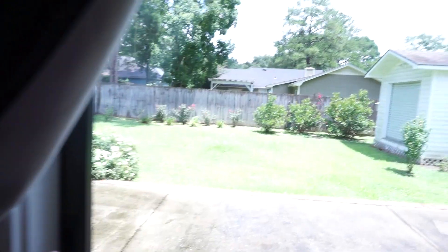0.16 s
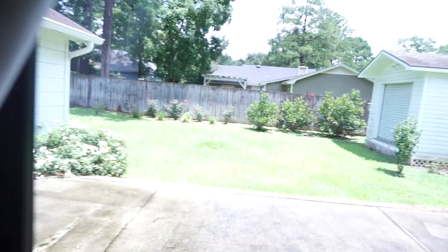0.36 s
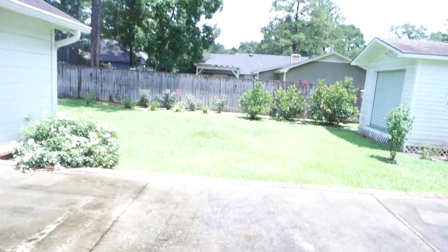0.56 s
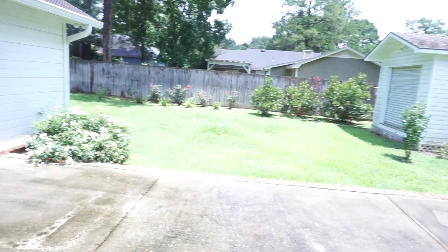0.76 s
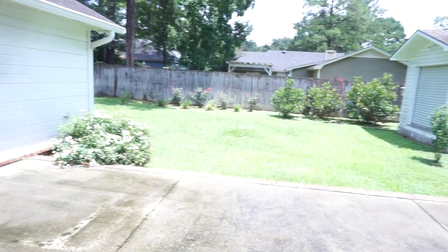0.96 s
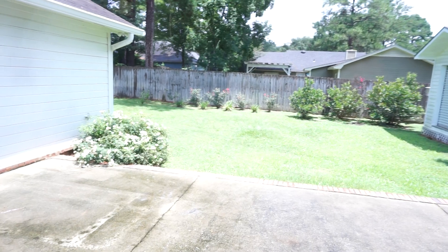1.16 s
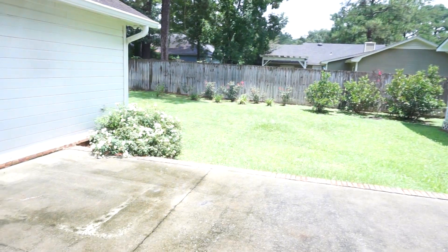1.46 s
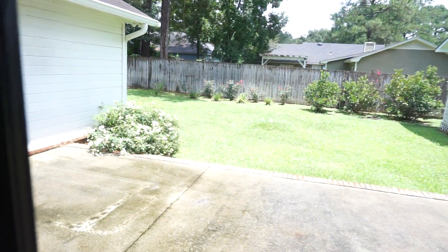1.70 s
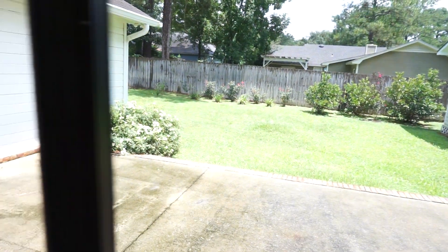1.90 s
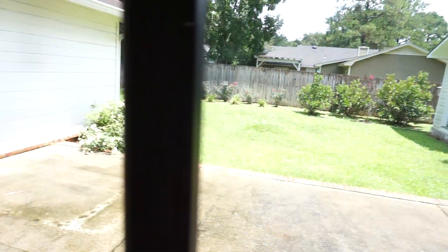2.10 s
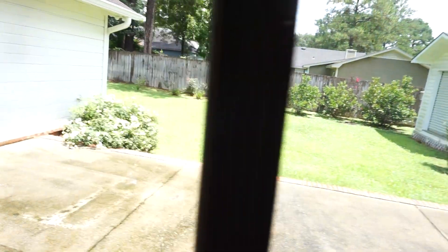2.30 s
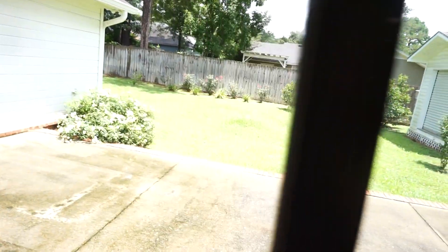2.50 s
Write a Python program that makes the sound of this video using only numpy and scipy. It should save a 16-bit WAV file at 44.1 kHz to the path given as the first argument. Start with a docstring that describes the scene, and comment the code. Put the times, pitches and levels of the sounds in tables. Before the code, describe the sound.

A sliding glass door opens close to a hand-held stereo microphone in a quiet room. Faint air and soft finger thuds come first, thickening from 0.75 to 1 second, with a light curtain brush. At about 1.03 the seal gives with a crackly rush until 1.3. Wheels then roll, loudest around 1.8 to 2.35, rasping, hissing, knocking and rattling with brief squeaks, then easing.

```python
"""Sliding glass door at close range

In a quiet house fingers shift on a hand-held camera: damped sine thuds over low noise in its body.
A curtain brushes past, then the door breaks from its seal with a rush, both as crackly friction noise.
The door rolls open: wheel noise rings resonances of pane and frame, grit rasps, hisses and bursts,
bumps in the track knock as decaying mode pairs, loose parts tick and the rollers squeak in gliding tones."""
import sys
import numpy as np
from scipy import signal
from scipy.fft import rfft, irfft, next_fast_len
from scipy.io import wavfile
from scipy.ndimage import uniform_filter1d, map_coordinates

SR = 44100
rng = np.random.default_rng(int(sys.argv[2]) if len(sys.argv) > 2 else 0)


def dump(signal):
    """Clip the signal to [-1, 1] and save it as 16-bit WAV at the path in sys.argv[1]."""
    limited = np.clip(np.atleast_2d(signal).T, -1, 1)
    pcm = np.round(limited * 32767).astype(np.int16)
    wavfile.write(sys.argv[1], SR, pcm)


N = 116865
T = np.arange(N) / SR  # time [s]

# Noise of the quiet room: (frequency [Hz], relative density [dB])
AIR_SPECTRUM = [(24, -70), (171, -17), (305, 0.5), (715, -9.5), (1180, -9.5), (1680, -13), (16000, -29)]
# Grip noise in the camera body: (time [s], level [dB])
GRIP_LEVEL = [(0, -49.5), (.1, -52.5), (.13, -97), (.3, -53.5), (.44, -54.5), (.55, -45.5), (.72, -50),
              (.8, -36.5), (.9, -33), (.95, -38), (1.0, -30), (1.04, -42), (1.28, -48), (1.55, -35.5),
              (1.75, -45), (2.65, -46)]
# Noise of the camera body: (frequency [Hz], relative density [dB])
BODY_SPECTRUM = [(35, -57), (60, -23), (130, -8), (280, -5.5), (493, -14.5), (1000, -29), (1300, -54),
                 (2200, -120)]
# Finger thuds: (time [s], level [dB], pitch [Hz])
FINGER_THUDS = [(0.004, -34.5, 320), (0.313, -34.5, 324), (0.35, -35, 336), (0.375, -39, 236),
                (0.461, -32.5, 392), (0.473, -33, 357), (0.514, -35.5, 247), (0.551, -29.5, 310),
                (0.67, -35, 298), (0.744, -28.5, 297), (.798, -29, 400), (0.814, -26, 228),
                (0.831, -31, 300), (0.846, -22.5, 493), (0.859, -24.5, 477), (0.869, -30, 285),
                (.883, -25, 456), (0.895, -24.5, 287), (0.915, -22, 360), (0.927, -22, 470),
                (0.947, -31, 354), (0.962, -24, 306), (0.975, -18.5, 446), (.996, -24, 400),
                (1.01, -34, 250)]
# Curtain and seal brushing: (time [s], level [dB], treble level [dB])
BRUSH_LEVELS = [(0.47, -77, -75), (0.495, -64, -75), (0.515, -52, -76), (0.6, -68.5, -82),
                (0.74, -101, -89), (0.765, -52, -53), (0.8, -44, -52), (0.87, -52.5, -69), (0.93, -56, -58),
                (0.97, -49, -47), (0.985, -33, -35.5), (1.025, -25.5, -34), (1.04, -26.5, -38),
                (1.06, -33, -45), (1.11, -28, -40.5), (1.15, -27, -30), (1.25, -29, -33.5),
                (1.272, -31, -38), (1.3, -58, -50.5), (1.36, -48.5, -55)]
# Brushing noise and its treble: (frequency [Hz], relative density [dB])
BRUSH_SPECTRUM = [(300, -18.5), (900, -9), (1600, -9.5), (2500, -5.5), (4200, -11), (5800, -10.5),
                  (7500, -22.5), (12000, -28.5)]
BRUSH_TREBLE_SPECTRUM = [(4000, -9), (8000, -1.5), (12000, -4.5), (16000, -12)]
# Roller squeaks: (start [s], length [s], start pitch [Hz], end pitch [Hz], level [dB], pitch waver [share])
ROLLER_SQUEAKS = [(1.388, .04, 4100, 4150, -44, .03), (1.389, .024, 12300, 12400, -43, .012),
                  (1.668, .065, 3880, 4030, -37.5, .015), (1.752, .03, 3900, 3850, -34, .015),
                  (1.797, .072, 3880, 4000, -33.5, .018), (1.795, .052, 4850, 4950, -31, .02),
                  (2.428, .06, 5500, 8600, -41, .015), (2.515, .025, 4900, 5500, -40, .03),
                  (2.574, .014, 3700, 3950, -36, .03), (1.03, .12, 420, 390, -32, .045),
                  (1.585, .035, 900, 720, -35, .03), (1.226, .042, 2000, 1350, -21, .24)]
# Grit crushed under a wheel: (time [s], level [dB], decay by 60 dB [s], darkness [dB per octave])
GRIT_BURSTS = [(0.5025, -55, 0.11, 11), (1.035, -6, 0.017, 3), (1.3905, -34, 0.16, -3.5),
               (1.498, -40, 0.061, -11), (1.6745, -28, 0.059, 3.5), (1.7325, -32.5, 0.085, 12),
               (1.7666, -22, 0.07, 3), (1.8269, -23.5, 0.078, 8), (1.8997, -14, 0.069, 2.5),
               (2.1201, -22, 0.061, 3), (2.3007, -19, 0.049, 3.5), (2.4568, -24.5, 0.088, 5.5),
               (2.5273, -25, 0.093, 4), (2.5837, -32.5, 0.11, 8.5)]
# Bumps in the track, and two chatters of loose parts near 1.9 kHz at 1.975 and 2.018 s: (time [s], level [dB],
# pitch [Hz])
TRACK_BUMPS = [(1.04, -17.5, 1056), (1.304, -21.5, 596), (1.39, -19.5, 432), (1.45, -16.5, 855),
               (1.732, -18.5, 939), (1.769, -13, 1570), (1.805, -14.5, 1007), (1.829, -8.5, 634),
               (1.87, -10, 655), (1.961, -9.5, 824), (1.975, -12.5, 1880), (2.018, -14.5, 1780),
               (2.224, -9.5, 848), (2.257, -10, 766), (2.334, -6, 655), (2.58, -17, 580)]
# Rolling wheels: (time [s], rumble level [dB], scrape level [dB], hiss level [dB])
ROLL_LEVELS = [(1.28, -48, -37, -42.5), (1.37, -45, -46.5, -52), (1.46, -37, -41, -49.5),
               (1.55, -40.5, -44.5, -50), (1.65, -31, -40, -47.5), (1.72, -31.5, -37.5, -38),
               (1.79, -27.5, -36.5, -40), (1.85, -26.5, -29.5, -28), (1.885, -31, -35, -37.5),
               (1.92, -24.5, -27.5, -26), (1.99, -27, -27.5, -28), (2.05, -26, -27.5, -30),
               (2.09, -26.5, -33.5, -37), (2.16, -29, -35, -33.5), (2.24, -27.5, -37.5, -38.5),
               (2.4, -29.5, -41.5, -44.5), (2.498, -32, -40, -40.5), (2.58, -33, -41.5, -42.5),
               (2.65, -37.5, -44.5, -44.5)]
# Wheel rumble, grit scrape and grit hiss: (frequency [Hz], relative density [dB])
RUMBLE_SPECTRUM = [(41, -47), (70, -42), (170, -10.5), (416, -0.5), (864, -3.5), (1500, -14), (1950, -65),
                   (3300, -120)]
SCRAPE_SPECTRUM = [(700, -27), (1150, -5.5), (2200, -6), (5000, -6), (9000, -27)]
HISS_SPECTRUM = [(2500, -5.5), (6000, 0.5), (14000, -3.5), (16000, -1)]
# Resonances of pane and frame: (frequency [Hz], width [Hz], gain [dB])
PANE_MODES = [(610, 25, -7), (648, 16, -1.5), (883, 18, -0.5), (1210, 33, -4), (1574, 24, -1),
              (1744, 18, 1), (1870, 14, 6), (1995, 24, 10), (2330, 25, 6), (2616, 22, 9.5)]
# Likeness of left and right: (frequency [Hz], coherence [share])
LIKENESS = [(150, 1), (600, 0.81), (1500, 1), (2500, 0.44), (5000, 0.45), (12000, 0.036)]
# Balance of the door: (frequency [Hz], left over right [dB])
DOOR_BALANCE = [(250, -1), (700, -2), (2000, -4.5), (12000, -4.5)]
# Phase by which left leads, for door, camera body and air: (frequency [Hz], lead [rad])
DOOR_PHASE = [(100, 0.13), (500, 0.32), (1500, 1.38), (3500, 1.46), (6500, 1.9)]
BODY_PHASE = [(100, -0.47), (800, -1.83)]
AIR_PHASE = [(400, 0.65), (2000, 1.76)]

AIR_DB = -58.5  # shared part of the air, before its left-right balance
THUD_CYCLES = 1.05  # cycles to the peak of a thud
SQUEAK_WAVER, SQUEAK_FLUTTER = 400, 180  # random knots per second, for pitch and level
SQUEAK_FLUTTER_DB, SQUEAK_OVER_DB = 3, -16  # flutter depth; each overtone over the fundamental
RATTLE_HZ, RATTLE_SPREAD = 1500, 1.6  # middle pitch; full width in log pitch
RATTLE_DECAY, RATTLE_DB = 2.8, 1.5  # time constant times pitch; level over the scrape
KNOCK_T60, KNOCK_OVER, KNOCK_OVER_DB = 0.023, 1.49, -7.5  # s; second mode over the first: ratio, dB
IMPACT_LOW_CUT_HZ = 296  # removes the bass made by abrupt sine starts of knocks and ticks
ROOM_T60, ROOM_DB = 0.056, -3  # s; shared reverberation over the direct sound
LOW_CUT_HZ, TOP_HZ = 127, 15900  # microphone band


def amp(db):
    """The decibel law: a level becomes an amplitude ratio."""
    return 10 ** (np.asarray(db) / 20)


def unit(x):
    """Power normalization: scale to rms 1."""
    return x / np.sqrt(np.mean(x ** 2) + 1e-20)


def along(points, hz):
    """Logarithmic frequency scale: interpolate (Hz, value) points along it."""
    frequency, value = np.transpose(points)
    return np.interp(np.log(hz + 1), np.log(frequency + 1), value)


def curves(rows):
    """Level envelopes: one dB curve per column, 120 dB down beyond 31 ms outside the table."""
    times, *columns = np.transpose(rows)
    inside = (T >= times[0] - .031) & (T <= times[-1] + .031)
    return [np.interp(T, times, column) - 120 * ~inside for column in columns]


def wobble(rate):
    """Band-limited fluctuation: a smooth curve through random knots, rate a second."""
    knots = rng.standard_normal(int(N * rate / SR) + 4)
    return map_coordinates(knots, [T * rate])


def filtered(x, response):
    """Linear filtering: multiply the spectrum by a complex response of frequency."""
    m = next_fast_len(N + SR // 2)
    hz = np.fft.rfftfreq(m, 1 / SR)
    return irfft(rfft(x, m) * response(hz), m)[..., :N]


def friction(spectrum, lumps_db, lump_rate, slow_db, ring=lambda hz: 1):
    """Sliding contact: a lumpy force drives two noises, shared and diffuse, of joint rms 1."""
    force = amp(lumps_db * wobble(lump_rate) + slow_db * wobble(29.82))
    noises = force * rng.standard_normal((2, N))
    return unit(filtered(noises, lambda hz: amp(along(spectrum, hz)) * ring(hz)))


def ports(pair, lead):
    """Spatial coherence: mix shared and diffuse sound to left and right, with a phase lead."""
    def split(hz):
        angle = np.arccos(np.clip(along(LIKENESS, hz), 0, 1)) / 2
        return np.array([np.cos(angle), np.sin(angle)])

    mid, side = filtered(pair, split)
    left_right = np.array([mid + side, mid - side])
    return filtered(left_right, lambda hz: np.exp(np.outer([.5j, -.5j], along(lead, hz))))


def add(track, s, sound):
    """Superposition: sum a sound into the track from s seconds on."""
    part = track[..., max(round(s * SR), 0):][..., :sound.shape[-1]]
    part += sound[..., :part.shape[-1]]


def room(x):
    """Reverberation: convolve with an exponentially decaying noise tail of energy 1."""
    t = T[:SR // 4]
    tail = rng.standard_normal(len(t)) * amp(-60 * t / ROOM_T60)
    return signal.fftconvolve(x, tail / np.linalg.norm(tail))[:N]


def air():
    """Ambient noise: steady broadband sound, its diffuse part the stronger."""
    return amp(AIR_DB) * friction(AIR_SPECTRUM, 0.47, 52.4, 0.14) * [[1], [1.6]]


def handling():
    """Structure-borne sound: damped thuds of a few cycles over lumpy rumble in the camera body."""
    thuds, t = np.zeros(N), T[:SR // 20]
    for s, db, hz in FINGER_THUDS:
        u = t * hz / THUD_CYCLES
        envelope = u ** 2 * np.exp(-2 * u + 0.56)
        # 12.5 dB brings the envelope's peak to 1
        add(thuds, s - .002, amp(db + 12.5) * envelope * np.sin(2 * np.pi * hz * t))
    level, = curves(GRIP_LEVEL)
    return thuds * [[1], [0]] + amp(level) * friction(BODY_SPECTRUM, 2.2, 90, .8)


def brushing():
    """Sliding friction of cloth and seal: crackly noise with its own treble."""
    level, treble = curves(BRUSH_LEVELS)
    body = amp(level) * friction(BRUSH_SPECTRUM, 1.8, 500, 0.31)
    return body + amp(treble) * friction(BRUSH_TREBLE_SPECTRUM, 2.0, 700, 0.65)


def squeaks():
    """Roller tones: gliding pitch with random frequency and amplitude modulation, and harmonics."""
    out, waver, flutter = np.zeros(N), wobble(SQUEAK_WAVER), wobble(SQUEAK_FLUTTER)
    for s, length, hz0, hz1, db, rough in ROLLER_SQUEAKS:
        u = np.clip((T - s) / length, 0, 1)
        hz = (hz0 + (hz1 - hz0) * np.sin(np.pi * u / 2)) * (1 + rough * waver)
        phase = 2 * np.pi * np.cumsum(hz) / SR
        over = amp(SQUEAK_OVER_DB) * (np.sin(2 * phase) + np.sin(3 * phase))
        over *= 3 * hz1 < TOP_HZ  # low squeaks only
        swell = np.sqrt(np.abs(np.sin(np.pi * u))) * (u < 1)
        out += amp(db + SQUEAK_FLUTTER_DB * flutter) * swell * (np.sin(phase) + over)
    return out


def grit():
    """Crushing of grains: sudden crackling noise bursts with exponential decay."""
    out, t = np.zeros((2, N)), T[:SR // 6]
    hz = np.fft.rfftfreq(len(t), 1 / SR)
    low_cut = (hz ** 2 / (hz ** 2 + 900 ** 2)) ** 2
    for s, db, t60, dark in GRIT_BURSTS:
        z = rng.standard_normal((3, len(t)))
        tilt = amp(-dark * np.log2((hz + 1) / 8000)) * low_cut
        crackle = amp(1.6 * unit(uniform_filter1d(z[2], size=30)))
        noise = irfft(rfft(z[:2] * crackle) * tilt, len(t))
        onset = 1 - np.exp(-t / 0.0014)
        add(out, s, amp(db - 1.5 - 60 * t / t60) * onset * noise)
    return out


def rattle(count=520):
    """Repeated impact of loose pane and rollers: dense damped ticks of scattered pitch, rms 1."""
    out, t, start = np.zeros(N), T[:SR // 100], ROLL_LEVELS[0][0]
    for when, pitch, size in rng.random((count, 3)):
        hz = RATTLE_HZ * np.exp(RATTLE_SPREAD * (pitch - .5))
        strength = (1.02 - size) ** -.4  # few strong ticks among many weak
        tick = np.exp(-t * hz / RATTLE_DECAY) * np.sin(2 * np.pi * hz * t)
        add(out, start + 1.4 * when, strength * tick)
    return out / out[round(start * SR):].std()


def knocks():
    """Impact excitation: each knock rings two frame modes, over chatter that follows the scrape."""
    scrape = curves(ROLL_LEVELS)[1]
    out, t = amp(scrape + RATTLE_DB) * rattle(), T[:SR // 8]
    onset = 1 - np.exp(-t / 0.00063)
    for s, db, hz in TRACK_BUMPS:
        second = amp(KNOCK_OVER_DB) * np.sin(2 * np.pi * KNOCK_OVER * hz * t)
        ring = np.sin(2 * np.pi * hz * t) + second
        add(out, s, amp(db - 60 * t / KNOCK_T60) * onset * ring)
    return out


def pane(hz):
    """Modal resonance: gain of the pane and frame modes added to a flat path."""
    modes = sum(amp(db) * hz * width / (centre ** 2 - hz ** 2 + 1j * hz * width)
                for centre, width, db in PANE_MODES)
    return 1 + np.abs(modes)


def rolling():
    """Roughness excitation: wheel rumble and grit scrape ring the pane, hiss lies above."""
    rumble, scrape, hiss = curves(ROLL_LEVELS)
    wheels = amp(rumble) * friction(RUMBLE_SPECTRUM, 0.73, 150, 0.16, pane)
    rasp = amp(scrape) * friction(SCRAPE_SPECTRUM, 1.1, 400, 0.69, pane)
    return wheels + rasp + amp(hiss) * friction(HISS_SPECTRUM, 1.6, 700, 0.39)


def scene():
    """Superposition of door, camera body and air, each with its own left-right balance."""
    impacts = filtered(knocks(), lambda hz: (1j * hz / (IMPACT_LOW_CUT_HZ + 1j * hz)) ** 2)
    points = impacts + squeaks()
    # Direct sound is shared; one tail joins it and another is diffuse
    near = np.array([points + amp(ROOM_DB) * room(points), room(points)])
    door = ports(brushing() + rolling() + grit() + near, DOOR_PHASE)
    door = filtered(door, lambda hz: amp(np.outer([.5, -.5], along(DOOR_BALANCE, hz))))
    body = amp([[.4], [-.4]]) * ports(handling(), BODY_PHASE)
    return door + body + amp([[-.8], [.8]]) * ports(air(), AIR_PHASE)


def record(dry):
    """Band limitation: the microphone drops the deepest bass and all above its upper limit."""
    return filtered(dry, lambda hz: (hz < TOP_HZ) * (1j * hz / (LOW_CUT_HZ + 1j * hz)) ** 2)


dry = scene()
out = record(dry)
dump(out)
```